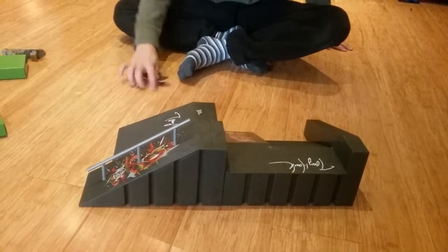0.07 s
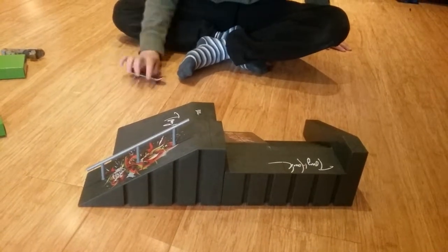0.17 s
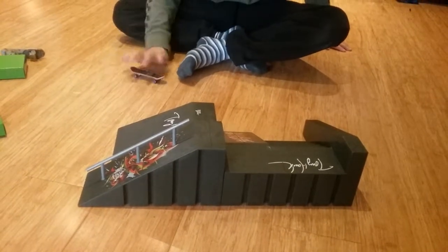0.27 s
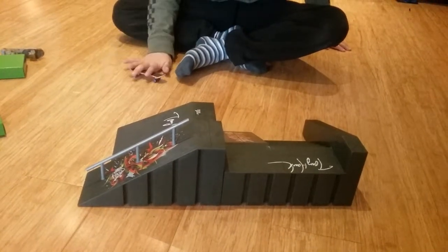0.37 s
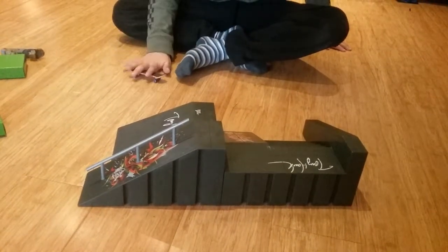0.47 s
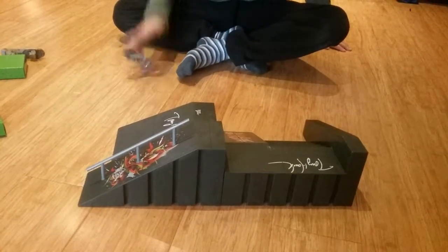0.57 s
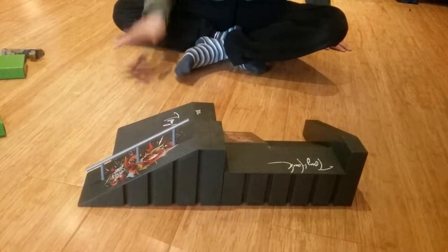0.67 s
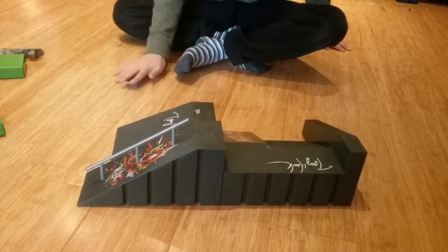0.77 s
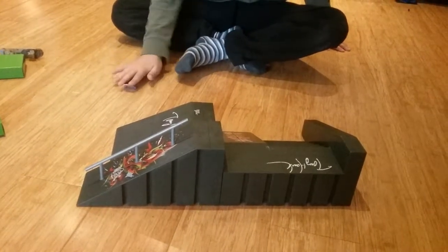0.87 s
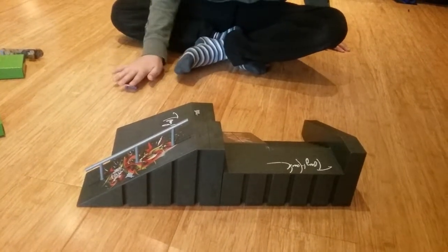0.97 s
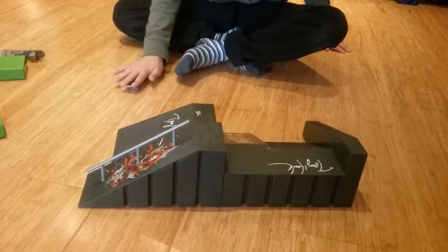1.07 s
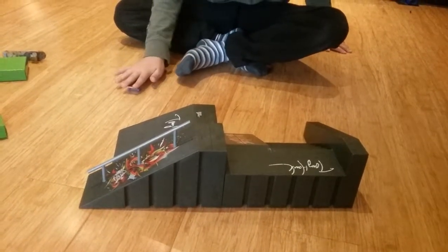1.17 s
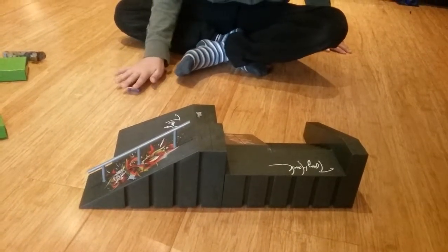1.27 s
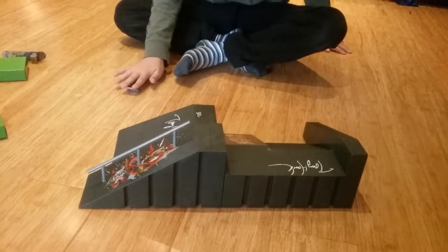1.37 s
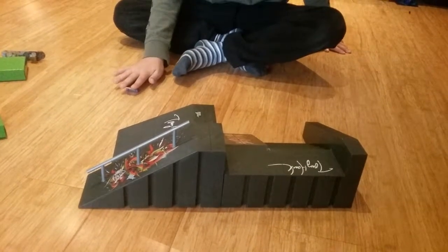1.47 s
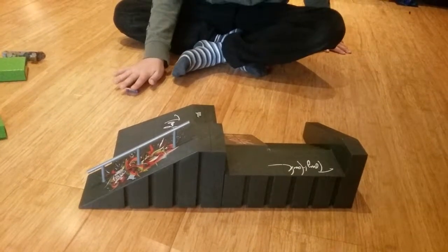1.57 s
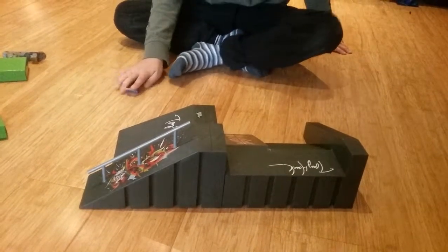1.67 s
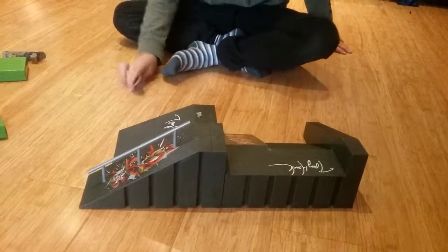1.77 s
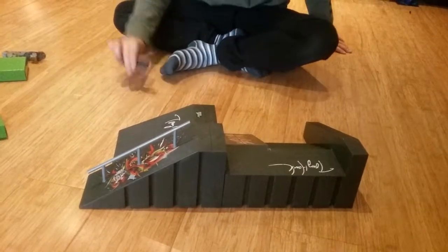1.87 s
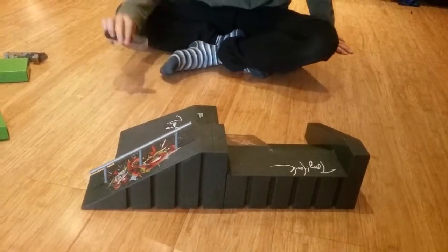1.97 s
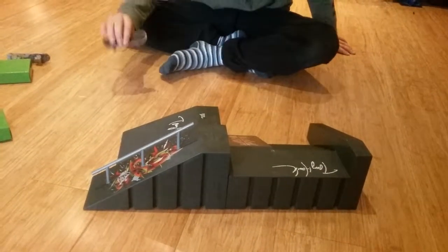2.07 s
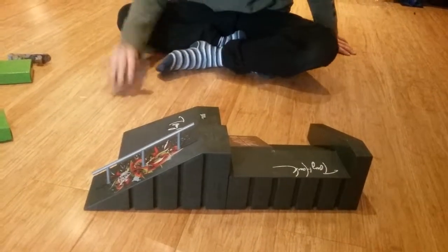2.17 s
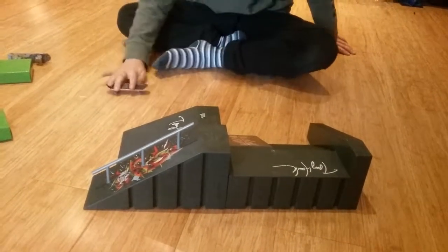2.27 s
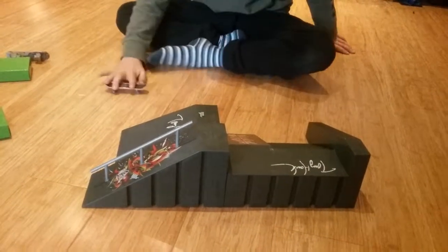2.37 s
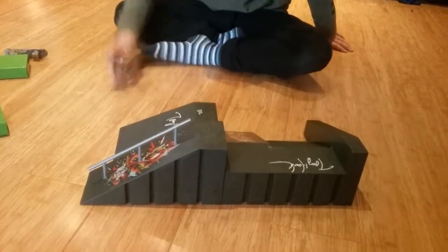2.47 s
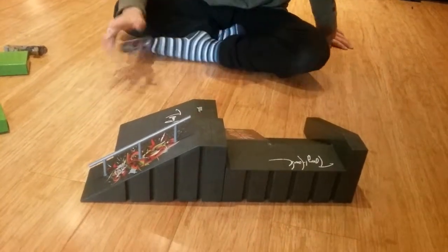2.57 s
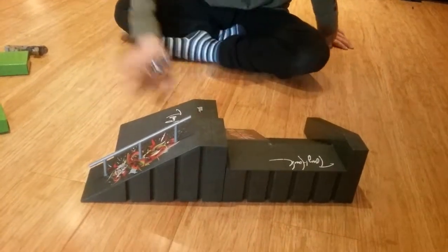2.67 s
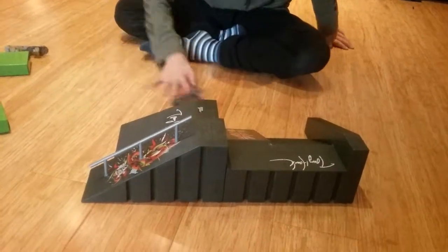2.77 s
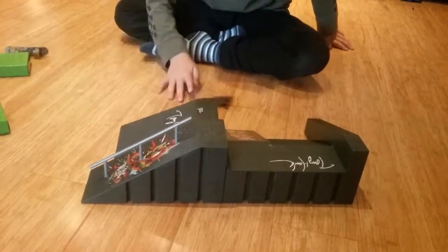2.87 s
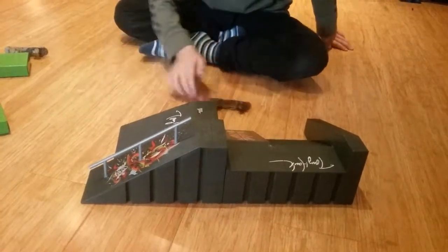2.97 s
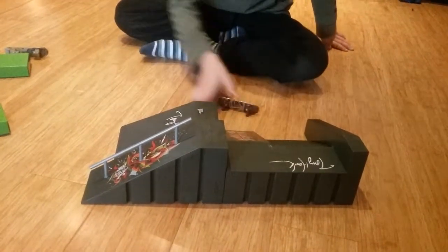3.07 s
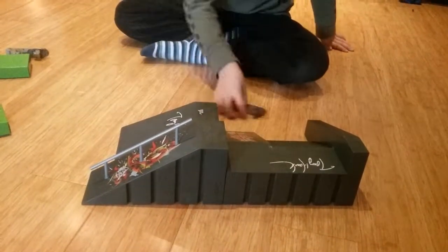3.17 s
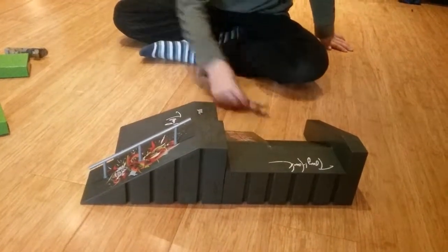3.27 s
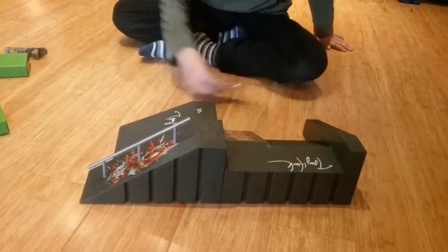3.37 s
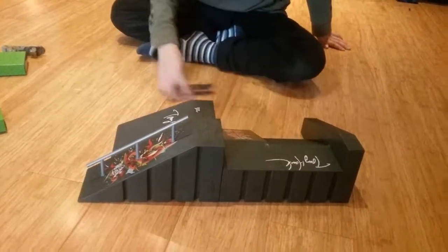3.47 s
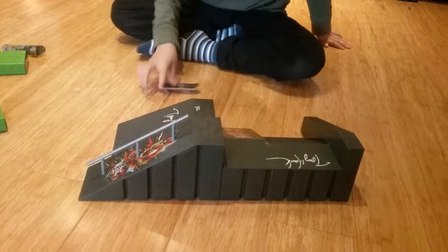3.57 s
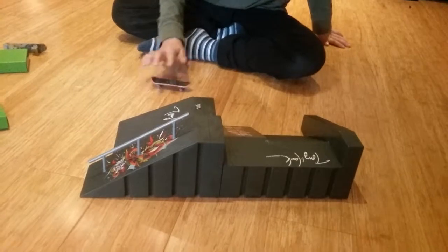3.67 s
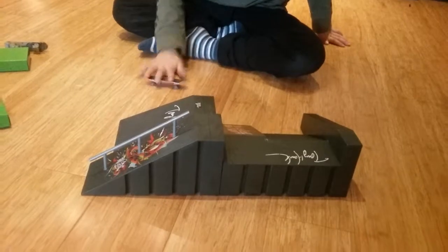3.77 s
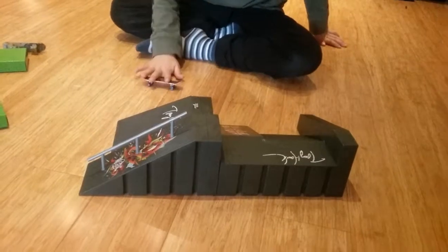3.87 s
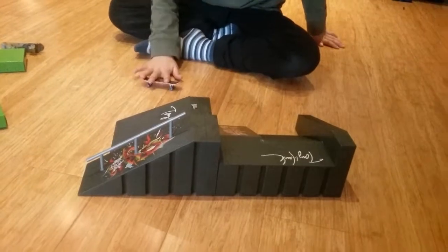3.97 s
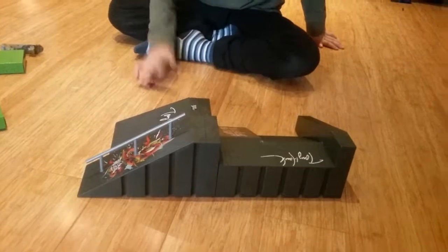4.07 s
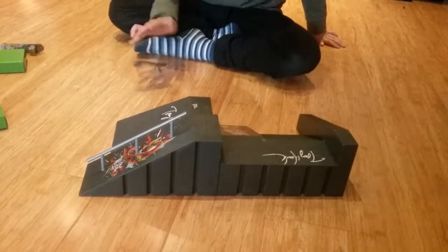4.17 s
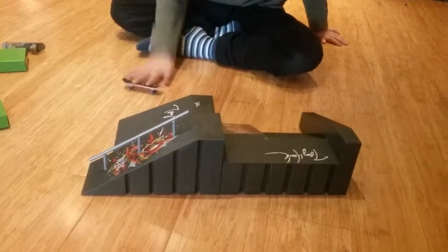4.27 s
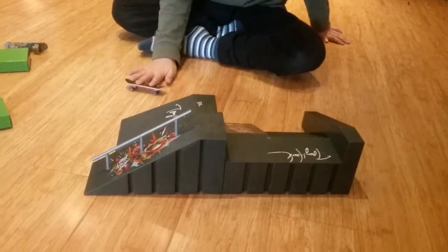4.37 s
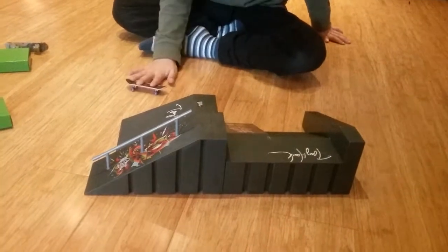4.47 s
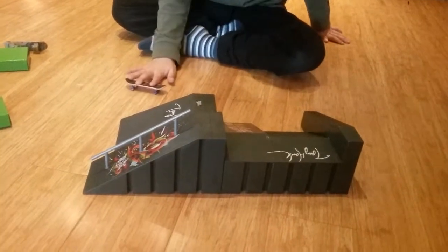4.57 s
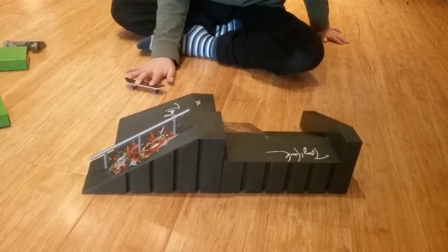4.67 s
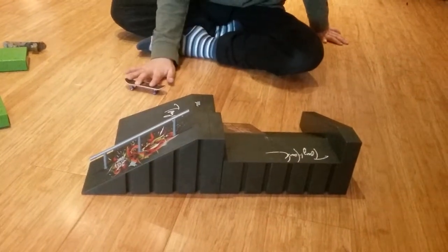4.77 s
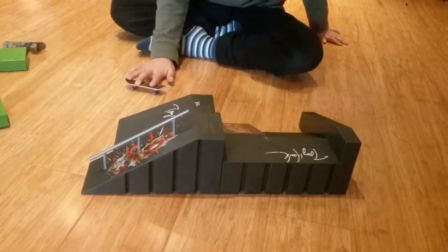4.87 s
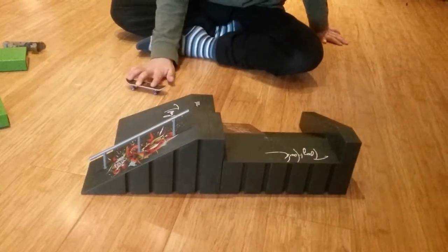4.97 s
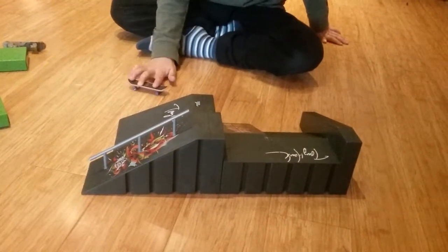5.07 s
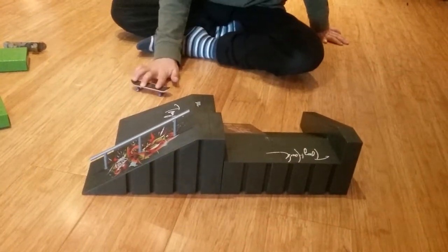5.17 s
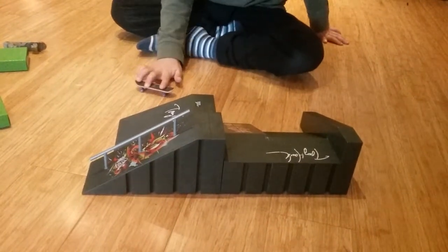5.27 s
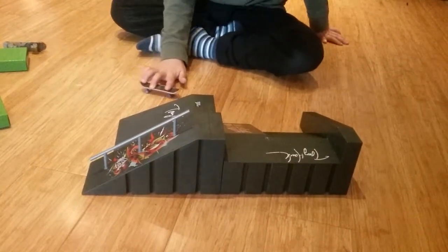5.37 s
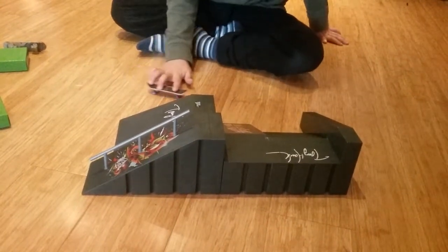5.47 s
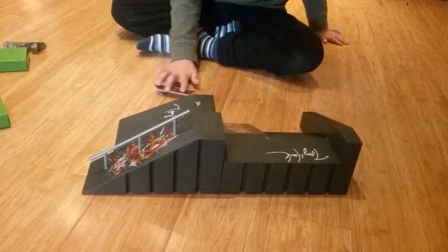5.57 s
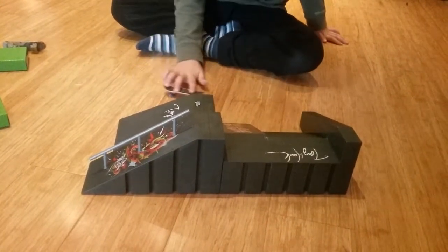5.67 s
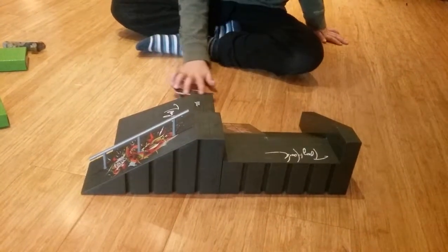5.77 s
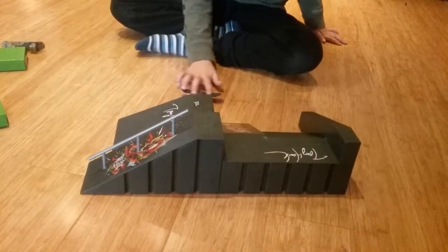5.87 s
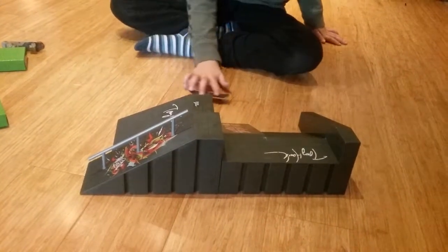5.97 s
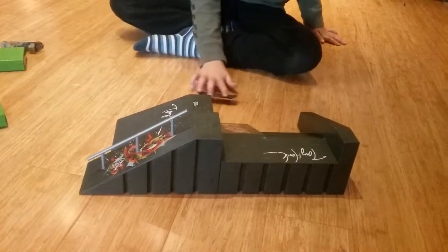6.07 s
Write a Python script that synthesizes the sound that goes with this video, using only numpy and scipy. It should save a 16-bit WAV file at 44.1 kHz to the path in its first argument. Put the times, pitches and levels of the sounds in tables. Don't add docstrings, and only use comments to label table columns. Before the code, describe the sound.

Close, slightly hissy stereo pickup of a tiny toy skateboard on floorboards indoors. Early landings snap and bounce, then it goes nearly silent before being pushed sideways with a dry scrape. Another series of knocks, truck clacks and short run-outs leads to a last multiple slap. After a near-still pause, little wheels rumble and tick over seams. Short live room echo, low house rumble.

```python
import sys
import numpy as np
from scipy import signal
from scipy.fft import rfft, irfft
from scipy.io import wavfile
from scipy.ndimage import uniform_filter1d

SR = 44100
rng = np.random.default_rng(int(sys.argv[2]) if len(sys.argv) > 2 else 0)


def magnitude_from_level(level_db):
    exponent = np.asarray(level_db, float) / 20
    return 10 ** exponent


def output_pcm(signal):
    pcm = np.clip(np.atleast_2d(signal).T, -1, 1) * 32767
    wavfile.write(sys.argv[1], SR, np.round(pcm).astype(np.int16))


N = 270099
LEAD = SR // 5
BINS = abs(np.fft.fftfreq(4096, 1 / SR))

HEAVY_HZ, LIGHT_HZ, WHEEL_HZ = 170, 340, 480
RING = 9.5
FACING_DB = 4

# (time [s], tick [dB], floor ring [dB], board ring [dB], loudest ring [Hz])
LANDINGS = [
    (-0.11, -23.5, -27, -15.5, 410),
    (0.0992, -12.5, -12, -14, 1620),
    (0.7477, -18.5, -5, -5, 1830),
    (2.5105, -21, -11.5, -9.5, 2020),
    (0.3868, -34, -8.5, -11.5, 740),
    (0.5982, -23, -8.5, -12.5, 2000),
    (2.7809, -28, -39, -25, 1420),
    (2.809, -10.5, -19.5, -7, 2934),
    (3.8362, -35.5, 0, -8, 753),
    (4.3088, -13.5, -10.5, -4.5, 1890),
]


def landings():
    return [(s, tick_db, floor, board, board - 2.5, hz, RING, HEAVY_HZ, 0)
            for s, tick_db, floor, board, hz in LANDINGS]


# (time [s], tick [dB], floor ring [dB], board ring [dB], loudest ring [Hz])
BOUNCES = [(0.1023, -27.5, 4, 0.5, 1110), (0.1103, -34.5, 7.5, 7, 730), (0.8033, -16, -5, -3.5, 1390),
           (0.8122, -14.5, -6.5, -14, 1020), (0.8268, -34.5, -21.5, -10.5, 926),
           (2.2877, -37.5, -0.5, -4, 994), (2.5665, -29.5, -41, -17, 2410), (2.8207, -17, -5.5, -4.5, 3100),
           (2.5127, -17.5, -15.5, -16, 1860), (3.2775, -28.5, -19, -14.5, 3920),
           (3.2915, -68, -13, -9, 880), (3.2872, -41.5, -5, -1, 4000), (2.5774, -24, -40, -34, 2440),
           (3.5602, -37, -1, 3, 693), (4.3282, -17, -3, 0, 1385), (4.3448, -8.5, -15.5, -13.5, 1940),
           (4.356, -15.5, -7, -9.5, 1070)]


def bounces():
    return [(s, tick_db, floor, board, board - 9.5, hz, RING, LIGHT_HZ, 0)
            for s, tick_db, floor, board, hz in BOUNCES]


# (time [s], tick [dB], floor ring [dB], truck ring [dB], loudest ring [Hz])
CLACKS = [
    (0.1239, -28, -11, -13, 916),
    (2.2662, -17, -19.5, -13, 606),
    (2.2714, -25.5, -20, -7.5, 835),
    (3.2735, -36.5, -2.5, -1, 1770),
    (3.4778, -16, -38, -16, 3950),
    (3.4795, -25, -8.5, -16, 2070),
    (3.4822, -23.5, -16, -4.5, 624),
    (0.8003, -6, -22, -15, 845),
    (3.5485, -28, -5.5, -4.5, 1520),
]


def clacks():
    return [(s, tick_db, floor, truck - 6, truck, hz, RING, HEAVY_HZ, 0)
            for s, tick_db, floor, truck, hz in CLACKS]


# (time [s], tick [dB], floor ring [dB], deck ring [dB], its mode [Hz])
POPS = [
    (4.0606, -62, -7, -0.5, 1823),
    (4.142, -21.5, -25.5, -13, 1956),
]


def pops():
    return [(s, tick_db, floor, deck, deck - 3.5, hz, 38, WHEEL_HZ, 0)
            for s, tick_db, floor, deck, hz in POPS]


def touched(s, tick_db, ring_db, ring_hz, truck_db, cut_hz, facing_db):
    on_deck = ring_hz > 1260
    neighbour_db = -10
    floor_db = ring_db + neighbour_db * on_deck
    deck_db = ring_db + neighbour_db * (not on_deck)
    return s, tick_db, floor_db, deck_db, ring_db + truck_db, ring_hz, RING, cut_hz, facing_db


# (time [s], tick [dB], ring of the part
# sounding [dB], its mode [Hz])
TOUCHES = [(0.092, -41, -4.5, 902), (.380, -55.5, 3, 912), (0.5663, -73.5, 0, 862), (0.59, -62, 10.5, 901),
           (2.473, -41.5, -10, 1445), (2.506, -41, -7, 1567), (2.792, -40.5, -11.5, 2094),
           (3.133, -60.5, 12.5, 3770), (3.256, -56.5, 12.5, 1506), (4.1422, -53, 13, 892),
           (3.827, -58.5, 7, 900), (3.937, -73.5, -0.5, 793), (4.115, -44.5, -15, 1588),
           (4.135, -57.5, -0.5, 2000), (4.306, -70.5, 10.5, 1480)]


def touches():
    return [touched(*row, -9.5, LIGHT_HZ, 0) for row in TOUCHES]


# (time [s], tick [dB])
CLICKS = [
    (1.8694, -50.5),
    (1.921, -54),
    (1.9732, -55.5),
    (2.1033, -54.5),
    (2.137, -49),
    (2.585, -35),
    (2.6987, -45),
    (3.3903, -49),
    (4.973, -57.5),
]
# (floor [dB], deck [dB], truck [dB], loudest ring [Hz])
CLICK_RINGS = (-28, -39, -16.5, 1997.5)


def clicks():
    return [(s, tick_db, *CLICK_RINGS, RING, WHEEL_HZ, FACING_DB) for s, tick_db in CLICKS]


# (time [s], tick [dB], ring of the part knocked [dB], its mode [Hz])
SEAMS = [(5.1304, -78.5, 13, 856), (5.3559, -57, 13, 1190), (5.4074, -72, 9, 624), (5.4436, -58.5, 3, 1240),
         (5.482, -57, 14, 760), (5.6432, -60, 11.5, 1330), (5.6808, -45.5, 6.5, 1430),
         (5.7054, -73, 14, 1300), (5.7685, -50.5, 9, 800), (5.9022, -48.5, 9, 1210),
         (5.915, -59, -22, 1140), (6.0364, -66, 18.5, 577), (6.0505, -46.5, 2.5, 1240),
         (6.0948, -59, 15.5, 1060)]


def seams():
    return [touched(*row, -18, WHEEL_HZ, FACING_DB) for row in SEAMS]


# (time [s], tick [dB], ring of the main part [dB], its #
# mode [Hz], trucks against it [dB])
SNAPS = [(0.8254, -24, -13, 6460, 1), (0.834, -25, -12, 5640, -2.5), (0.8445, -31.5, -7, 1500, -6),
         (0.8525, -29.5, -21, 6500, 0), (2.8083, -37, 1, 2400, 13), (2.811, -27.5, -2, 2930, 2.5),
         (2.8224, -25, -2, 1990, 0.5), (2.834, -28.5, -6, 5900, 6), (2.846, -32, -3.5, 3200, 6.5),
         (2.6978, -42, -14, 3930, -4.5), (3.2165, -61.5, 9.5, 720, 0), (3.2524, -49, -5.5, 5070, -2),
         (3.4826, -22, -12.5, 4560, 5), (3.5464, -33, -8, 4300, -3.5), (3.6314, -47.5, 1, 780, -3),
         (4.1431, -41, 0, 3440, -1), (4.1525, -41, -15.5, 6700, -1), (4.157, -39, -11.5, 5940, 0),
         (4.3098, -25, -3, 3900, -2), (4.3405, -22.5, -4.5, 890, -7.5), (4.3675, -25, -15, 6530, 1.5),
         (4.3751, -25, -5.5, 6800, 1.5), (4.389, -25.5, -10, 5900, -3), (2.8208, -23.5, -5, 6150, -7),
         (2.8262, -24.5, -7.5, 2660, 0), (2.862, -27.5, -3, 2840, -6), (4.3285, -21, 3, 1490, -8),
         (4.331, -30, 4.5, 1400, -8.5), (2.553, -37.5, -14.5, 2130, 10.5), (2.595, -42.5, -14.5, 2200, 7),
         (2.609, -42.5, -19.5, 3540, 5), (3.288, -38.5, 1, 4900, -4.5), (3.297, -46.5, 6, 3900, -9),
         (0.1005, -21.5, -15.5, 5000, 2.5), (0.1157, -26, -1, 6000, -6), (0.569, -62, -18, 8000, -2),
         (4.1445, -47, 7, 1970, -11), (4.146, -54.5, 7, 900, -13.5), (3.842, -50.5, 6, 1130, -9),
         (0.392, -48.5, 1.5, 1190, -6.5)]


def snaps():
    return [touched(*row, WHEEL_HZ, FACING_DB) for row in SNAPS]


def evened(x):
    return x / np.sqrt(np.mean(x ** 2) + 1e-20)


def read(points, hz):
    f, value = np.transpose(points)
    return np.interp(np.log(hz + 1), np.log(f + 1), value)


def causal(power, cut_hz):
    radiated = power * BINS ** 4 / (BINS ** 4 + cut_hz ** 4)
    log_gain = np.log(radiated + 1e-9 * power.max()) / 2
    return np.fft.ifft(np.exp(np.conj(signal.hilbert(log_gain)))).real[:1600]


def rings(modes, detune=0.94):
    power = sum(magnitude_from_level(2 * db) / (1 + (2 * (BINS - hz * d) / width) ** 2) ** 1.25
                for (hz, width, db), d in zip(modes, detune * np.ones(len(modes))))
    return power / power.mean()


# (frequency [Hz], level [dB])
TICK = [(3000, -47.5), (4500, 1), (5300, 1.5), (6300, 8), (7000, 4.5), (8000, -8.5), (11000, -12),
        (14000, -11.5), (15000, -15), (15600, -6)]


def tick():
    power = magnitude_from_level(2 * read(TICK, BINS)) * np.clip(BINS / 3000, 0, 1) ** 4
    return power / power.mean()


# (frequency [Hz], width [Hz], level [dB])
FLOOR = [(190, 90, -25), (340, 61, -21), (704, 110, -8), (710, 420, -0.5), (903, 76, 5), (1110, 220, 2)]
DECK = [(1430, 330, 2), (1783, 440, 2.5), (2067, 400, 1.5), (2520, 430, -2.5)]
TRUCK = [(3130, 340, -6), (3840, 660, 0), (5060, 1100, -5)]


def blow(tick_db, floor_db, deck_db, truck_db, ring_hz, ring, cut_hz, facing_db, pan_db, chance):
    t = np.arange(256) / SR
    shared, left, right = chance[:768].reshape(3, 256) * (t / .0014) ** 2 * np.exp(-t / 0.00081)
    z = rfft([shared + 1.8 * left, shared + 0.94 * right])
    cluster = irfft(z / abs(z) ** .7)
    cluster = cluster * np.clip(t / 0.00088, 0, 1) ** 2 * np.exp(-(t / 0.0071) ** 2)
    cluster = cluster / np.linalg.norm(cluster, axis=1, keepdims=True)
    cluster = cluster * magnitude_from_level(np.array([[.5], [-.5]]) * pan_db)
    cluster[1] = np.roll(cluster[1], 5)
    power = magnitude_from_level(2 * 14.74) * tick()
    detunes = 1 + 0.029 * chance[768:].reshape(3, 6)
    levels_db = floor_db + 13.5, deck_db + 15.5, truck_db + 22
    for modes, db, detune in zip((FLOOR, DECK, TRUCK), levels_db, detunes):
        power = power + magnitude_from_level(2 * db) * rings(modes, detune[:len(modes)])
    peak = ring / (1 + (2 * (BINS - ring_hz) / 380) ** 2) ** 2
    near = causal(power * (1 + 1.4 * peak), cut_hz)
    far = causal(power * (1 + .45 * peak), cut_hz)
    sound = np.array([np.convolve(c, near) for c in cluster] + [np.pad(far, (40, 215))])
    return magnitude_from_level(tick_db) * sound * magnitude_from_level(facing_db * np.array([[1], [1], [0]]))


# (frequency [Hz], width [Hz], level [dB])
JOISTS = [(539.5, 200, -9.5)]


def roll(rows, whir_width_hz):
    s, *columns = np.transpose(rows)
    t = np.arange(s[0], s[-1], 1 / SR)
    rumble = rings(JOISTS + FLOOR[2:] + DECK[:1])
    whir = rings([(2200, whir_width_hz, 7), (3900, 570, -0.5)])
    scrape = tick()
    out = 0
    for level_db, power in zip(columns, (rumble, whir, scrape)):
        hits = rng.standard_normal(len(t)) * (rng.random(len(t)) < 2500 / SR)
        bumps = hits * magnitude_from_level(3.8 * np.minimum(rng.exponential(1, len(t)), 3))
        smooth = uniform_filter1d(uniform_filter1d(bumps, size=500), size=500)
        throb_db = 2.1 * evened(smooth)
        gain = magnitude_from_level(np.interp(t, s, level_db) + throb_db - 6.5)
        out = out + gain * evened(np.convolve(bumps, causal(power, 500))[:len(t)])
    return s[0], out * signal.windows.tukey(len(t), .16) * magnitude_from_level([[-1], [1.2], [0]])


def driven(curve, mix):
    middle_db = -72
    return [(s, *(db + share * (level - middle_db) for db, share in mix)) for s, level in curve]


# (time [s], pressure [dB])
SLIDE = [
    (1.66, -92),
    (1.72, -73),
    (1.79, -59),
    (1.86, -68.5),
    (2.06, -74.5),
    (2.13, -70.5),
    (2.2, -73.5),
    (2.26, -55),
]
# (level at middle pressure [dB], share of pressure followed [0-1])
SLIDE_MIX = [(-82, 0.2), (-76.5, 0.95), (-71, 1)]


def slide():
    return roll(driven(SLIDE, SLIDE_MIX), 520)


# (time [s], speed [dB])
RIDE = [
    (4.9, -91),
    (4.99, -80.5),
    (5.154, -71),
    (5.312, -64.5),
    (5.408, -50.5),
    (5.524, -53.5),
    (5.706, -45),
    (5.854, -51),
    (6.12, -55),
]
# (level at middle speed [dB], share of speed followed [0-1])
RIDE_MIX = [(-71.5, 0.8), (-75.5, 0.0091), (-86, 0.77)]


def ride():
    return roll(driven(RIDE, RIDE_MIX), 110)


# (start [s], length [s], rumble [dB], scrape [dB], change by the end [dB])
RUNOUTS = [
    (0.46, 0.15, -92, -83, 14.5),
    (2.529, 0.24, -80, -70, -9),
    (2.897, 0.28, -44.5, -44, -22),
    (3.199, 0.3, -50.5, -48, -38.5),
    (3.55, 0.4, -48.5, -46, -35),
    (3.995, 0.13, -77.5, -74.5, 2),
    (1.211, 0.042, -99, -73.5, 9),
]


def runouts():
    out = []
    for s, length, rumble, scrape, fade in RUNOUTS:
        rows = [(s + u * length, rumble + u * fade, scrape - 5 + u * fade, scrape + u * fade) for u in (0, 1)]
        out.append(roll(rows, 520))
    return out


def push(db, hz, t60):
    t = np.arange(SR // 3) / SR
    turns = hz * (t + .002 * (1 - np.exp(-t / .006)))
    wave = np.sin(2 * np.pi * turns) + 0.5 * np.sin(2 * np.pi * 1.9 * turns)
    return magnitude_from_level(db - 60 * t / t60) * (1 - np.exp(-t / 0.0044)) * wave


# (time [s], level [dB], pitch [Hz])
THUMPS = [(0.382, -38.5, 190), (0.603, -48.5, 196), (0.806, -37.5, 134), (0.823, -42, 73), (0.87, -45, 170),
          (2.271, -44.5, 186), (2.432, -46.5, 190), (2.508, -50, 190), (2.537, -37.5, 170),
          (2.555, -48.5, 72), (2.596, -43.5, 137), (2.62, -60, 74), (2.655, -62.5, 80),
          (2.816, -40.5, 80.5), (3.717, -43, 190), (3.731, -44, 65), (3.837, -55.5, 170),
          (4.059, -55.5, 250), (4.11, -47, 98), (4.149, -46.5, 256), (4.177, -40, 148), (4.215, -51, 233),
          (4.356, -44, 65.4)]


def thumps():
    return [(s, push(db, hz, 0.043) * magnitude_from_level([[1.5], [-1.5], [-7]])) for s, db, hz in THUMPS]


# (time [s], level [dB])
BOOMS = [
    (2.849, -40),
    (3.029, -53),
    (3.117, -49.5),
    (3.303, -53),
    (3.588, -52),
    (3.887, -54),
]


def booms():
    return [(s, push(db, 360, .09) * magnitude_from_level([[-6], [-7], [-3]])) for s, db in BOOMS]


# (frequency [Hz], correlation [-1 to 1])
SAME = [(60, -0.1), (300, 0.3), (640, 0.16), (1400, -0.34), (15000, 0.068)]


def diffuse(gain):
    a, b, c, d = rng.standard_normal(gain.shape[::-1] + (4,)).T
    same = np.clip(read(SAME, np.fft.rfftfreq(512, 1 / SR)), -1, 1)[:, None]
    left = a + 1j * b
    right = same * left + np.sqrt(1 - same ** 2) * (c + 1j * d)
    return signal.istft(np.array([left, right]) * gain, nperseg=512, noverlap=384)[1]


# (frequency [Hz], T60 [s])
ROOM = [(150, 0.79), (400, 0.27), (1000, 0.35), (2500, 0.39), (4500, 0.34), (6300, 0.39), (8000, 0.34),
        (15000, 0.23)]
# (frequency [Hz], level [dB])
ECHO = [(200, -10.5), (600, 5), (1200, 0), (2500, 0), (5000, -4), (9000, -4), (15000, 2.5)]
# (frequency [Hz], level [dB])
STANDING = [(366, -9), (533, -10.5), (624, -4.5), (737, -9.5), (797, -12), (893, -23), (1076, -20.5),
            (1415, -21.5)]


def room(x):
    hz, t = np.fft.rfftfreq(512, 1 / SR)[:, None], np.arange(260) * 128 / SR
    tail = diffuse(magnitude_from_level(read(ECHO, hz) - 60 * t / read(ROOM, hz)))
    u = np.arange(tail.shape[1]) / SR
    sparse = np.where(rng.random(tail.shape[1]) < .1 + u / .05, 1, .35)
    tail = tail * sparse * np.clip((u - .004) / 0.00024, 0, 1)
    tail = tail / np.linalg.norm(tail[0])
    for (f, db), phase in zip(STANDING, 2 * np.pi * rng.random((len(STANDING), 2))):
        wave = np.sin(2 * np.pi * f * u + phase[0] + np.array([[0], [.15]]) * phase[1])
        tail = tail + magnitude_from_level(db - 44.5 - 60 * u / 0.35) * (1 - np.exp(-u / 0.0043)) * wave
    return signal.fftconvolve(x[None], magnitude_from_level(1.0) * tail, axes=1)[:, :len(x)]


# (start [s], length [s], level [dB])
SWELLS = [
    (-.2, 0.28, -63.5),
    (0.11, 0.71, -78.5),
    (.62, .47, -68),
    (1.32, 0.56, -73),
    (2.26, 0.11, -82),
    (2.494, 0.22, -63.5),
    (2.76, .16, -65.5),
    (4.047, 0.23, -70),
    (4.297, 0.16, -60),
    (4.78, 0.12, -73),
]


def rumble():
    t = np.arange(N) / SR
    band = signal.butter(2, [79 - 6, 79 + 6], "bandpass", fs=SR, output="sos")
    common, left, right = signal.sosfilt(band, rng.standard_normal((3, N)))
    gain = magnitude_from_level(-85)
    for s, length, db in SWELLS:
        edge = np.clip(np.minimum(t - s, s + length - t) / 0.067, 0, 1)
        gain = gain + magnitude_from_level(db) * edge ** 2
    return evened(common + 0.66 * np.array([left, right])) * gain * magnitude_from_level([[2], [-1]])


# (frequency [Hz], density [dB per Hz])
HISS = [(65, -28), (110, -7.5), (260, -16), (450, -19), (1200, -21.5), (2400, -24.5), (3500, -28),
        (6000, -34), (10400, -33.5), (13000, -31.5), (15000, -31), (15700, -28)]


def hiss():
    hz = np.fft.rfftfreq(512, 1 / SR)[:, None]
    noise = diffuse(magnitude_from_level(read(HISS, hz)) * np.ones(N // 128 + 5))[:, :N]
    return magnitude_from_level(-71.5) * evened(noise)


# (time [s], level [dB])
WHINE = [(0, -68), (.2, -64), (1.05, -65), (1.22, -77), (2.15, -75), (2.3, -64), (3.6, -64), (3.8, -68),
         (4.0, -75), (4.2, -64), (4.55, -64), (4.72, -76), (6.12, -74)]


def whine():
    t = np.arange(N) / SR
    tone = np.sqrt(2) * np.sin(2 * np.pi * 15600 * t)
    return tone * magnitude_from_level(np.interp(t, *np.transpose(WHINE)) + [[-18], [0]])


def deep_noise():
    drift = signal.lfilter([1], [1, -.996], rng.standard_normal((2, N)))
    return magnitude_from_level(-88.5) * evened(drift)


def add(mix, s, sound):
    part = mix[..., LEAD + round(s * SR):][..., :sound.shape[-1]]
    part += sound[..., :part.shape[-1]]


# (time [s], left-right [dB], echo share [dB])
PLACE = [(0, 0, 2.5), (0.118, -2.5, 2.5), (.4, 3, 0), (0.599, -4, 2), (.75, 0, 0), (1.2, 0, -3),
         (2.1, -1, 2), (2.498, -5.5, 1), (2.8, -3, 1), (3.27, 3, 0), (3.602, -0.5, 0.5), (4.2, -5.5, 0.5),
         (4.9, 1, 4.5), (5.3, -2.5, 1), (6.12, -2.5, 5.5)]


def scene():
    spots = np.zeros((4, 3, LEAD + N))
    s_place, pan_db, echo_db = np.transpose(PLACE)
    blows = landings() + bounces() + clacks() + pops() + touches() + clicks() + seams() + snaps()
    patterns = rng.standard_normal((76, 786))
    for k, (s, *row) in enumerate(blows):
        sound = blow(*row, np.interp(s, s_place, pan_db), patterns[k % len(patterns)])
        add(spots[k % 4], s - .001, sound)
    for s, sound in [slide(), ride()] + runouts():
        add(spots[0], s, sound)
    for s, sound in thumps():
        add(spots[1], s, sound)
    for s, sound in booms():
        add(spots[2], s, sound)
    wet = magnitude_from_level(np.interp((np.arange(LEAD + N) - LEAD) / SR, s_place, echo_db))
    heard = sum(x[:2] + room(wet * x[2]) for x in spots)[:, LEAD:]
    return heard + hiss() + rumble() + whine() + deep_noise()


def band_limit(x):
    return signal.sosfilt(signal.butter(12, 17000, fs=SR, output="sos"), x)


# (frequency [Hz], left-right [dB])
LEAN = [(60, -6), (130, 3), (290, 0.5), (640, 1), (1410, -0.5), (3100, 0), (6820, 3.5), (15000, 2)]


def record(dry):
    hz = np.fft.rfftfreq(N, 1 / SR)
    edge_db = -46 * np.clip((hz - 15690) / 140, 0, 1)
    lean = magnitude_from_level(np.array([[.5], [-.5]]) * read(LEAN, hz) + edge_db)
    return band_limit(irfft(rfft(dry) * lean, N) - .0005)


dry = scene()
out = record(dry)
output_pcm(out)
```